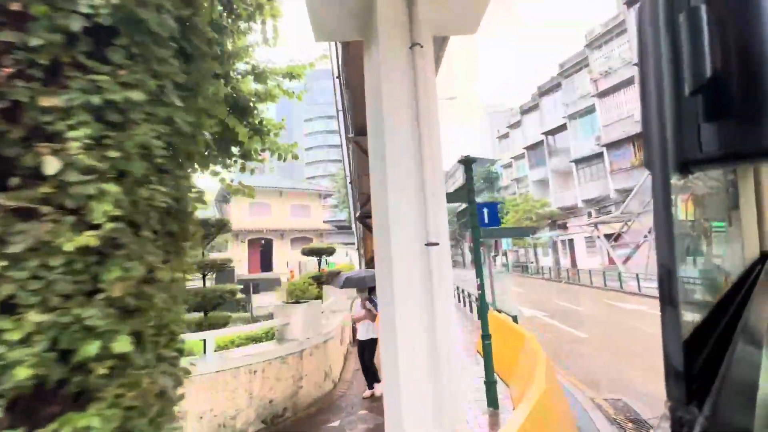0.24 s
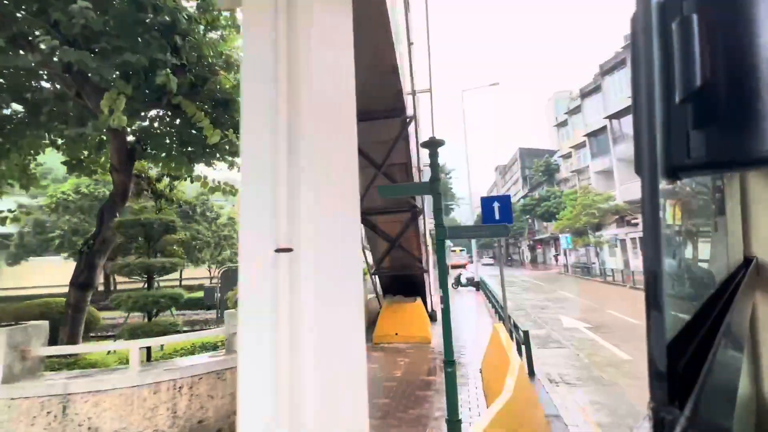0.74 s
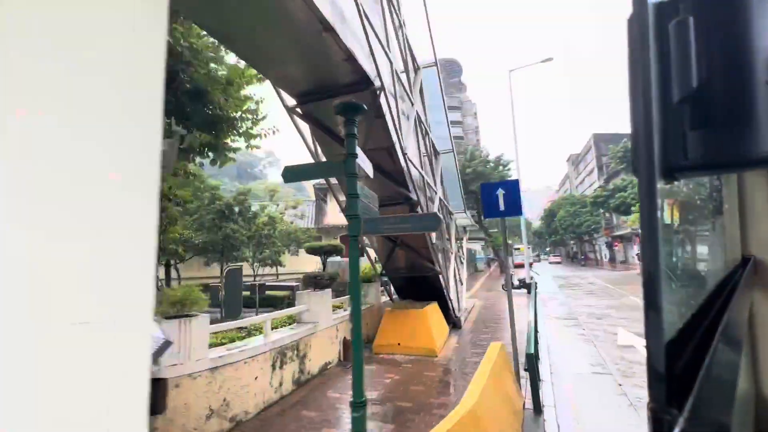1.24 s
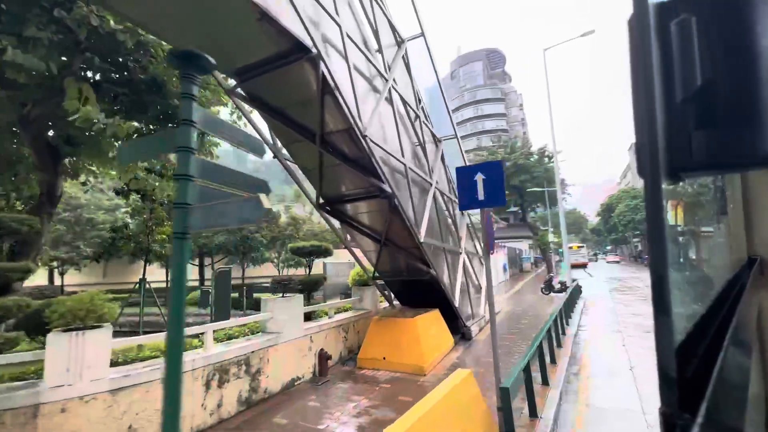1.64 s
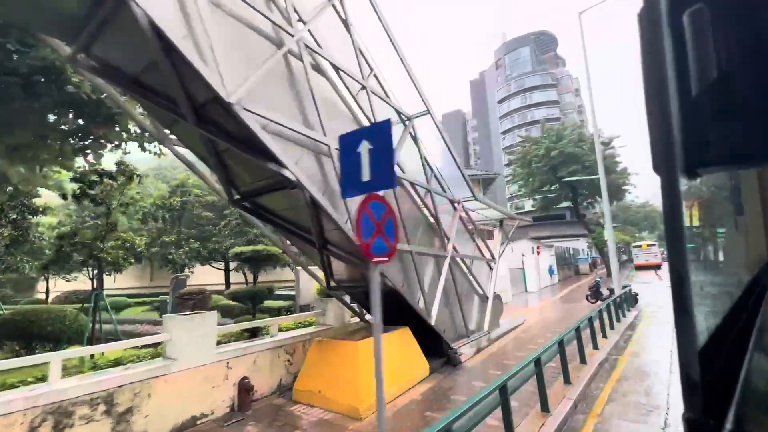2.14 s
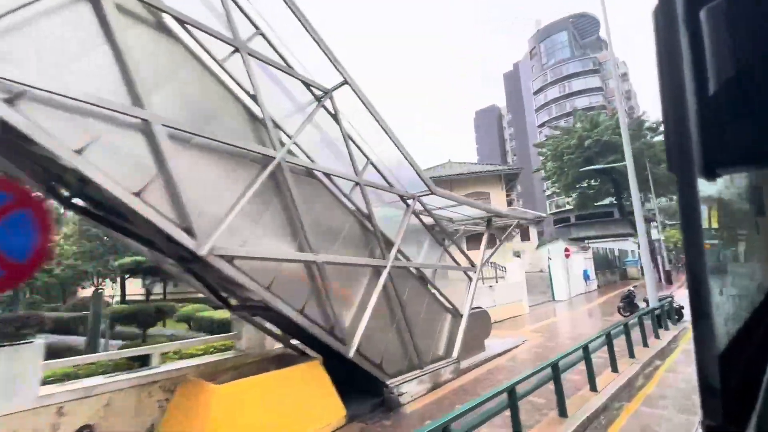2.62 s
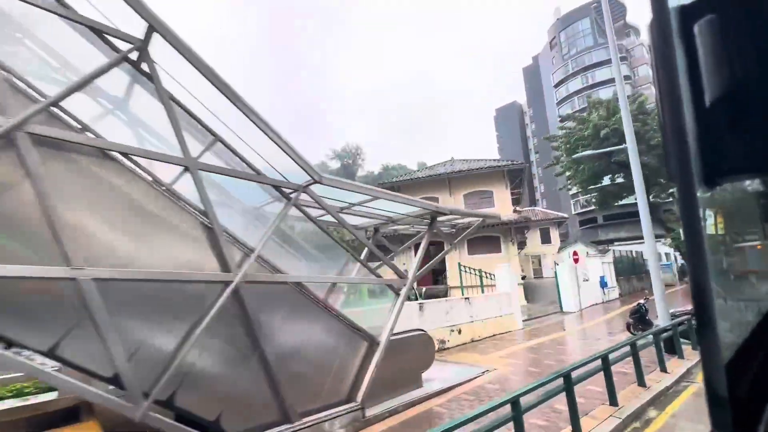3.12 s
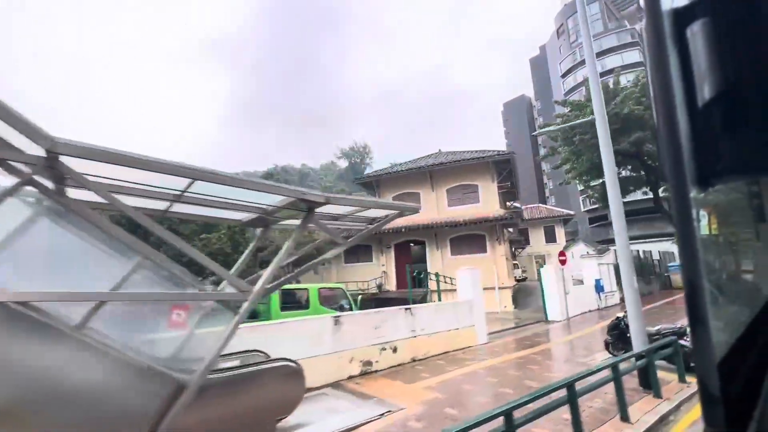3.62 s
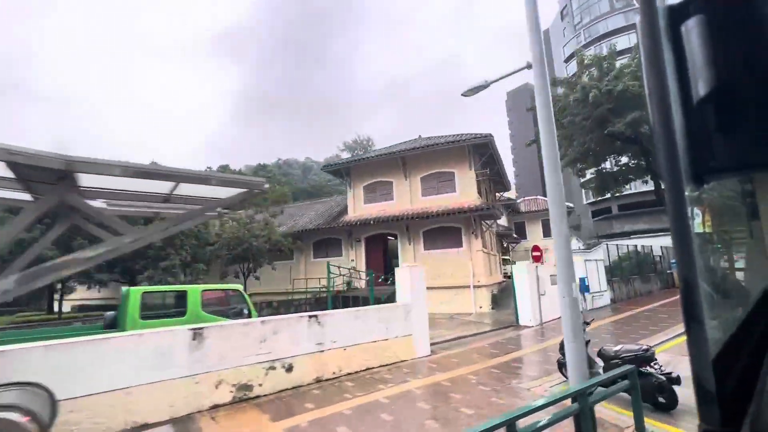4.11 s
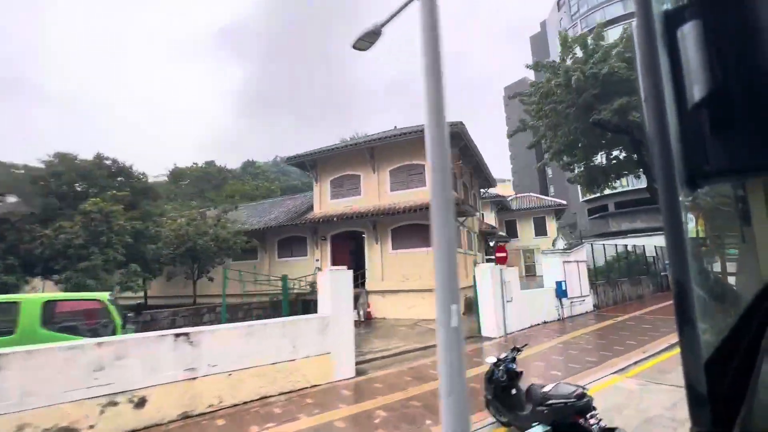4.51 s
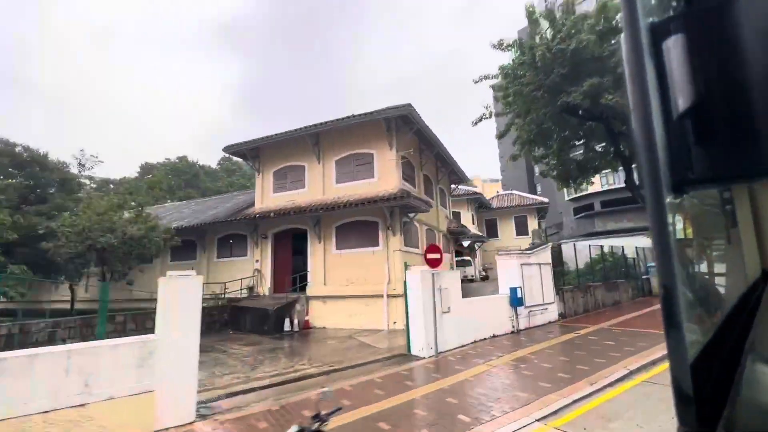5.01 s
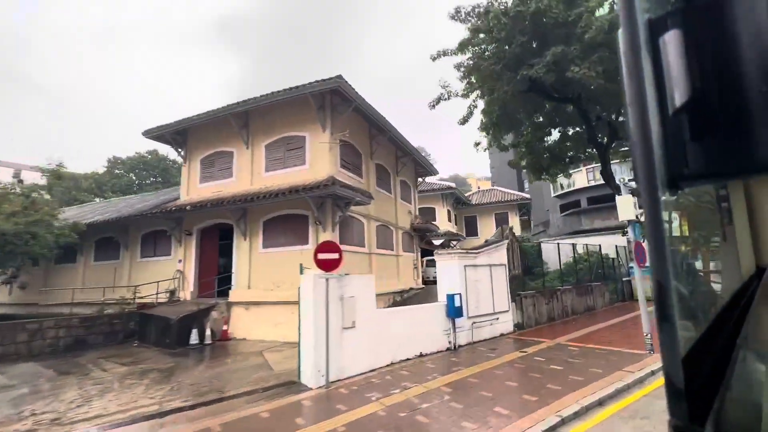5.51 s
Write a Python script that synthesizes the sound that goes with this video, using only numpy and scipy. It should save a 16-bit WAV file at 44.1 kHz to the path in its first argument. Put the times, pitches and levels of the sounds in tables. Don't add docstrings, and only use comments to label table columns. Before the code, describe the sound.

Close beside a diesel bus pulling along a wet street, the engine climbs with a deep boom, rough rumble and metallic clatter. A thin turbo whistle rises, tyres hiss on water, and walls and posts throw the boom back in pulses. Then the driver lifts off, gear whines slide down, and the engine settles to a softer idle over street murmur. Stereo microphone at an open window.

```python
import sys
import numpy as np
from scipy import signal
from scipy.fft import rfft, irfft
from scipy.io import wavfile
from scipy.ndimage import uniform_filter1d

SR = 44100
rng = np.random.default_rng(int(sys.argv[2]) if len(sys.argv) > 2 else 0)


def unload_audio(sound):
    columns = np.transpose(np.atleast_2d(sound))
    steps = np.round(np.clip(columns, -1, 1) * 32767)
    wavfile.write(sys.argv[1], SR, steps.astype(np.int16))


def gain_from_db(level_db):
    decades = np.asarray(level_db, float) / 20
    return 10 ** decades


N = 253575
T = np.arange(N) / SR

# time in seconds, cylinder firings per second in Hz.
ENGINE_SPEED = [(0, 61), (.37, 67), (.51, 71), (.91, 79.6), (1.22, 84.4), (1.42, 86.6), (1.7, 86.6),
                (2.02, 83.5), (2.15, 81.8), (2.48, 81), (2.96, 79), (3.5, 75.6), (4.07, 68.6), (4.5, 48.5),
                (5.5, 49), (5.75, 52)]
# time in seconds, load on the crank in dB, effort of the whole engine in dB.
DRIVER_FOOT = [(0, -1, -3), (.15, -2, -0.5), (.6, -1.5, 0), (1.1, -0.5, 2), (1.6, 1.5, 1), (2, 4, -1),
               (2.5, -0.5, -1), (2.8, -1.5, -3), (3.05, 1, -4), (3.15, -8, -4), (3.6, -21, -4.5),
               (4.05, -12.5, -6.5), (4.5, -28, -10.5), (5, -17, -8.5), (5.4, -18, -13), (5.75, -10, -11)]
# centre in Hz, width in Hz, boost in dB.
BODY_MODES = [(146, 16, 9), (173, 10, 5), (205, 20, 3), (260, 10, 7), (318, 12, 3)]
# centre in Hz, width in Hz, boost in dB.
BLOCK_MODES = [(1585, 47, 0.5), (1992, 75, 6), (2794, 160, 3.5), (4150, 170, 4), (6370, 250, 0)]


def evened(x):
    return x / np.sqrt(np.mean(abs(x) ** 2) + 1e-20)


def read(points, hz):
    f, value = np.transpose(points)
    return np.interp(np.log(hz + 1), np.log(f + 1), value)


def columns(rows):
    seconds, *values = np.transpose(rows)
    return [np.interp(T, seconds, v) for v in values]


def bumps(modes, hz):
    return sum(db * np.exp(-(2 * (hz - f) / width) ** 2) for f, width, db in modes)


def wander(hz):
    count = N // 64 + 2
    steps = rng.standard_normal(count) + 1j * rng.standard_normal(count)
    smoothing = np.exp(-(np.fft.fftfreq(count, 64 / SR) / hz) ** 2)
    slow = np.fft.ifft(np.fft.fft(steps) * smoothing)
    return np.interp(np.arange(N) / 64, np.arange(count), evened(slow))


def tone(hz, level_db, width_hz, fuzz):
    shake = np.sqrt(1 - fuzz) + np.sqrt(fuzz) * wander(width_hz)
    spin = np.exp(2j * np.pi * np.cumsum(hz) / SR)
    return np.sqrt(2) * gain_from_db(level_db) * (shake * spin).real


def whine(rows, width_hz, fuzz):
    start, end = rows[0][0], rows[-1][0]
    fade = np.clip(np.minimum(T - start, end - T) / 0.082, 0, 1)
    return fade * tone(*columns(rows), width_hz, fuzz)


def ports(x):
    # pitch in Hz, left minus right in dB.
    tilt = [(60, 2), (180, 2.5), (400, 3.5), (650, 6), (1100, 1), (1450, 1), (1800, 2.5), (2200, 1),
            (2850, 4.5), (3400, 0.5), (4300, 2), (5500, 1.5), (8500, -4), (10400, -1)]
    # pitch in Hz, extra lead of the left port in radians.
    twist = [(60, 0.24), (400, -0.5), (900, 0.21), (1350, 0.48), (1650, 0.096), (2000, -1.28), (2400, 0.38),
             (2900, 0.45), (3300, -0.061), (6000, 1), (7000, 0.21)]
    lead_s, lead_ends_hz = 0.000493, 9400
    hz = np.fft.rfftfreq(N, 1 / SR)
    lead = (2 * np.pi * hz * lead_s + read(twist, hz)) * (hz < lead_ends_hz)
    half = gain_from_db(read(tilt, hz) / 2) * np.exp(0.5j * lead)
    return irfft(rfft(x) * np.array([half, 1 / half]), N)


def noise(colour, modes, size, patchy_db, flicker_db):
    # pitch in Hz, likeness of the two ports from 0 to 1.
    likeness = [(60, 0.52), (200, 0.48), (550, 0.51), (900, 0.64), (1150, 0), (1600, 0.8), (2200, 0.78),
                (3000, 0.1), (4200, 0), (6500, 0.3), (8200, 0.13), (10300, 0.56), (13600, 1), (14000, 0.2)]
    frames, hz = 4 * N // size + 5, np.fft.rfftfreq(size, 1 / SR)
    a, b, c, d, patches = rng.standard_normal((frames, len(hz), 5)).T
    patches = uniform_filter1d(patches, size // 80, 0)
    patches = evened(uniform_filter1d(patches, 8192 // size, 1))
    flicker = evened(uniform_filter1d(rng.standard_normal(frames), 4096 // size + 1))
    apart = np.sqrt((1 - np.clip(read(likeness, hz), 0, 1)) / 2)[:, None]
    both = np.sqrt(1 - apart ** 2) * (a + 1j * b)
    own = apart * (c + 1j * d)
    colour_db = (read(colour, hz) + bumps(modes, hz))[:, None]
    gain = gain_from_db(colour_db + patchy_db * patches + flicker_db * flicker)
    spectra = np.array([both + own, both - own]) * gain
    left, right = evened(signal.istft(spectra, nperseg=size, noverlap=size * 3 // 4)[1][:, :N])
    return np.array([ports(left)[0], ports(right)[1]])


def pedal(level_db, of_load, of_effort):
    load_db, effort_db = columns(DRIVER_FOOT)
    return gain_from_db(level_db + of_load * load_db + of_effort * effort_db)


def crank_turns():
    return np.cumsum(columns(ENGINE_SPEED)[0] / 3) / SR


def boom():
    # start in seconds, hold in seconds, level in dB.
    swells = [(0.028, 0.49, -13.5), (0.626, 0.0085, -17.5), (0.765, 0.032, -17), (0.914, 0.42, -17.5),
              (1.437, 0.037, -26), (1.75, .01, -23), (2.102, 0.024, -17.5), (2.214, 0.0082, -19),
              (2.325, 0.014, -25), (2.553, 0.045, -23), (2.72, 0.028, -15), (2.854, 0.1, -19.5),
              (3.057, .01, -21.5), (3.18, 0.29, -33), (3.573, .04, -29.5), (3.783, .01, -29.5),
              (3.93, 0.022, -28), (4.047, 0.0091, -32), (4.276, .02, -32), (4.42, 0.056, -33),
              (4.548, .02, -32), (4.786, .06, -33), (5.38, .08, -39)]
    rise_s, fall_s = 0.045, 0.064
    strength = pedal(level_db=-26, of_load=1.15, of_effort=0.34)
    for start, hold, db in swells:
        swell = np.minimum((T - start) / rise_s, (start + hold - T) / fall_s) + 1
        strength = strength + gain_from_db(db) * np.clip(swell, 0, 1) ** 2
    return strength


def engine():
    # waves per turn of the crank, level in dB.
    uneven_orders = [(1.5, -48), (2, -32), (2.5, -30), (3.5, -38), (4, -42), (4.5, -36), (5, -37),
                     (5.5, -35), (6, -32), (6.5, -39), (7, -41), (7.5, -36), (9, -38), (10.5, -45),
                     (11, -42), (13, -46)]
    crank, crank_hz = crank_turns(), columns(ENGINE_SPEED)[0] / 3
    firing = boom() * np.cos(2 * np.pi * 3 * crank)
    uneven = 0
    for order, db in uneven_orders:
        shake = 0.86 + 0.33 * wander(5.5)
        lift_db = bumps(BODY_MODES, order * crank_hz)
        spin = np.exp(2j * np.pi * (order * crank + rng.random()))
        uneven = uneven + gain_from_db(db + lift_db) * (shake * spin).real
    load_db = columns(DRIVER_FOOT)[0]
    return np.sqrt(2) * (firing + uneven * gain_from_db(load_db))


def rumble():
    # pitch in Hz, level in dB.
    colour = [(12, -45), (20, -30), (55, 3.5), (81, 5.5), (97, -4.5), (125, -2.5), (165, -6.5), (243, -7.5),
              (343, -6), (448, -20), (544, -8.5), (700, -21.5), (910, -87), (1540, -120)]
    gain = pedal(level_db=-22.5, of_load=0.27, of_effort=0.37)
    return gain * noise(colour, BODY_MODES, size=4096, patchy_db=0.96, flicker_db=0.5)


def clatter():
    # pitch in Hz, level in dB.
    colour = [(240, -37), (400, 2), (686, -8), (803, 0.5), (1080, -7), (1440, -1.5), (1830, -5),
              (2190, -6.5), (2570, -10.5), (5000, -21.5), (6500, -49), (11000, -120)]
    crank = crank_turns()
    throb = 1 + 0.11 * np.cos(2 * np.pi * 3 * crank) + 0.04 * np.cos(np.pi * crank)
    gain = pedal(level_db=-26, of_load=0.016, of_effort=0.97) * throb
    return gain * noise(colour, BLOCK_MODES, size=1024, patchy_db=0.92, flicker_db=0.14)


def turbo():
    # time in seconds, pitch in Hz, level in dB.
    whistle = [
        (.72, 9400, -51),
        (1, 10680, -41.5),
        (1.3, 11930, -43),
        (1.6, 12350, -36),
        (1.77, 12440, -38),
        (2, 12080, -41.5),
        (2.6, 11430, -46.5),
        (2.9, 11200, -43.5),
        (3.95, 9630, -56),
    ]
    return whine(whistle, width_hz=310, fuzz=0.92)


def timing_gears():
    # time in seconds, level in dB.
    loudness = [(0, -54), (.28, -37), (.42, -48), (.6, -47), (.8, -40), (1.95, -42), (2.15, -49),
                (3.1, -58), (3.6, -75)]
    # tooth meetings per turn of the crank, level in dB.
    meshes = [(25, -3), (28.5, -1), (47.5, -3), (50, -1), (55, 0), (69, -1), (76, -3)]
    # centre in Hz, width in Hz, boost in dB.
    cover = [(1450, 380, 10), (820, 100, 6), (560, 80, 6)]
    crank_hz, load_db = columns(ENGINE_SPEED)[0] / 3, columns(loudness)[0]
    total = 0
    for order, db in meshes:
        ring_db = bumps(cover, order * crank_hz)
        total = total + tone(order * crank_hz, load_db + db + ring_db, width_hz=10, fuzz=0.4)
    return total


def road_gears():
    # time in seconds, pitch in Hz, level in dB.
    axle = [(2.05, 1712, -44), (2.2, 1690, -38), (2.43, 1662, -38), (2.6, 1640, -47), (3, 1580, -45),
            (3.3, 1500, -39), (3.6, 1425, -43), (4.03, 1296, -39), (4.15, 1255, -50)]
    hub = [(3, 1790, -50), (3.15, 1760, -45), (3.35, 1715, -46), (3.55, 1690, -44), (3.75, 1625, -46),
           (3.95, 1570, -50)]
    idle = [
        (5.2, 1103, -46),
        (5.45, 1130, -43),
        (5.75, 1100, -46),
    ]
    road = whine(axle, width_hz=9, fuzz=0.12) + whine(hub, width_hz=9, fuzz=0.4)
    return road + whine(idle, width_hz=5, fuzz=0.4)


def spray():
    # pitch in Hz, level in dB.
    colour = [(1470, -35), (2500, -8), (2830, -2.5), (3160, -9), (4140, -5.5), (5300, -5.5), (6050, -7),
              (7440, -13.5), (10400, -11.5), (13000, -19.5)]
    gain = pedal(level_db=-34, of_load=0.032, of_effort=0.65)
    return gain * noise(colour, BLOCK_MODES, size=512, patchy_db=1.4, flicker_db=0.58)


def intake():
    # pitch in Hz, level in dB.
    colour = [(9000, -30), (11000, -1), (13000, 4), (15100, 6), (15800, -1)]
    gain = pedal(level_db=-46, of_load=0.12, of_effort=1.6)
    return gain * noise(colour, [], size=512, patchy_db=-3.0, flicker_db=1.5)


def street():
    # pitch in Hz, level in dB.
    colour = [(12, -50), (20, -18), (31, -33.5), (59, -20), (112, -15), (141, -7), (298, -10.5),
              (416, -12.5), (598, -14), (768, -9.5), (1300, -13.5), (1980, -17.5), (3090, -25),
              (10500, -34.5), (15600, -99)]
    return gain_from_db(-36) * noise(colour, BLOCK_MODES, size=2048, patchy_db=1.6, flicker_db=1.8)


def scene():
    tones = engine() + turbo() + timing_gears() + road_gears()
    return ports(tones) + rumble() + clatter() + spray() + intake() + street()


def roll_off(x):
    return signal.sosfilt(signal.butter(12, 15710, fs=SR, output="sos"), x)


def record(dry):
    # centre in Hz, width in Hz, change in dB.
    notches = [(5200, 200, -10), (7480, 400, -13), (9300, 300, -3)]
    hz = np.fft.rfftfreq(N, 1 / SR)
    left, right = rfft(dry) * gain_from_db(bumps(notches, hz))
    mid = (left + right) / 2 * gain_from_db(-9 * (hz > 15180))
    side = (left - right) / 2 * ((hz < 10400) | (hz > 13700))
    mix = irfft(np.array([mid + side, mid - side]), N)
    return roll_off(mix)


dry = scene()
out = record(dry)
unload_audio(out)
```